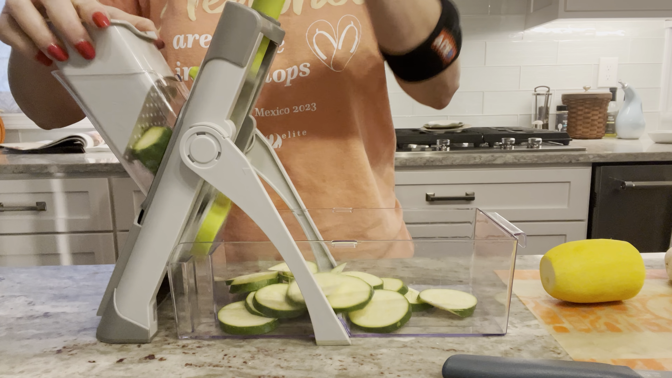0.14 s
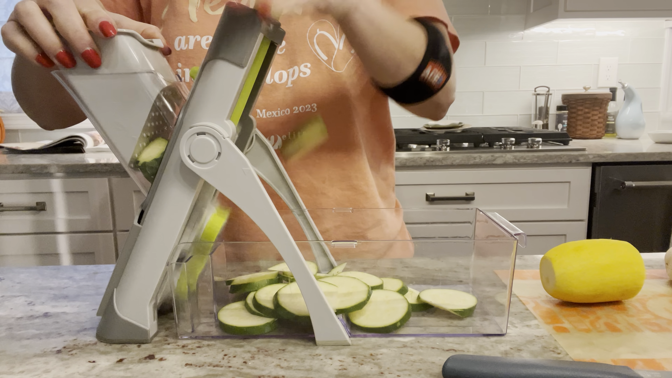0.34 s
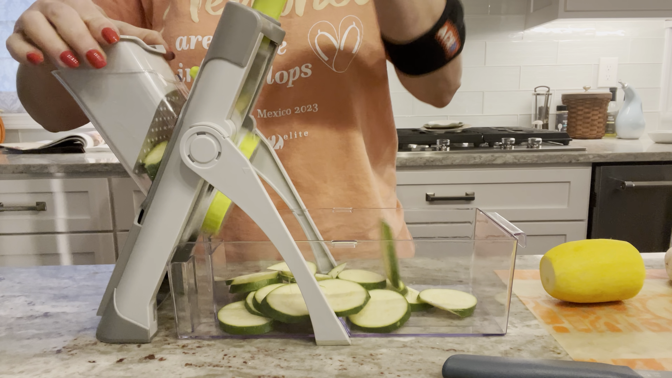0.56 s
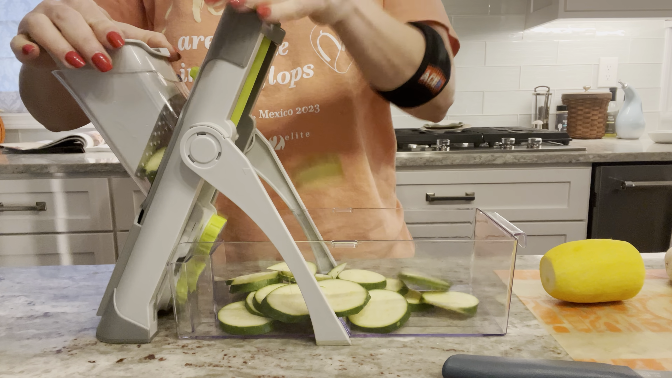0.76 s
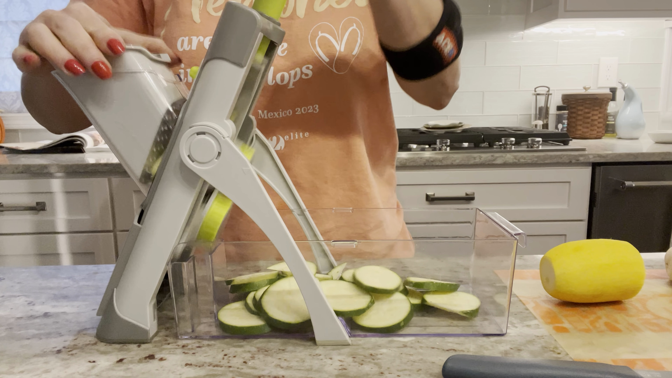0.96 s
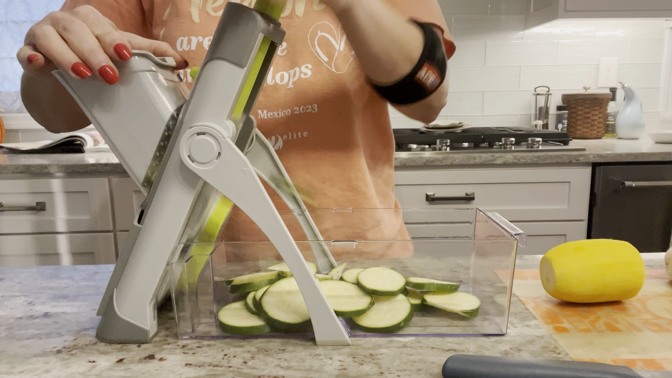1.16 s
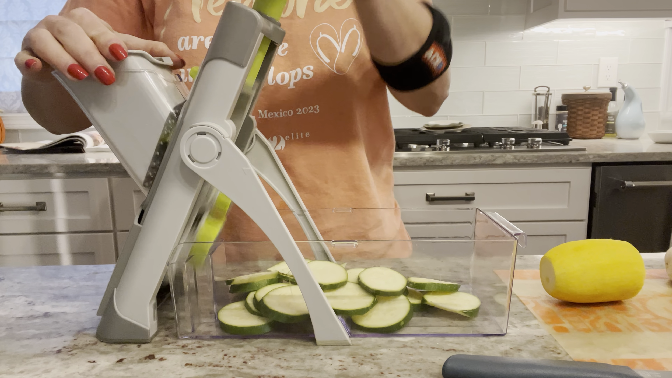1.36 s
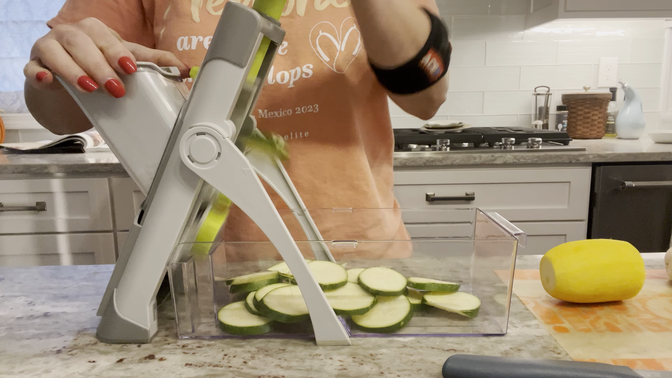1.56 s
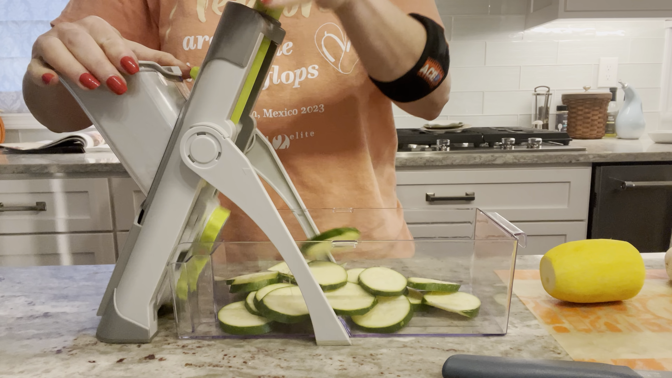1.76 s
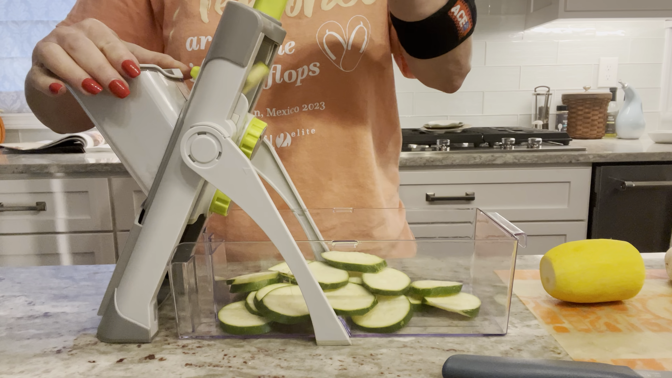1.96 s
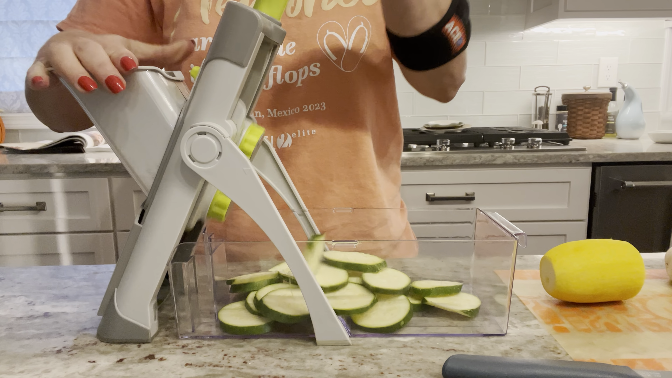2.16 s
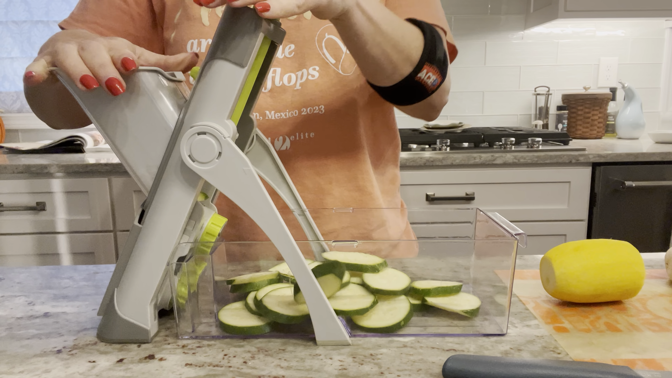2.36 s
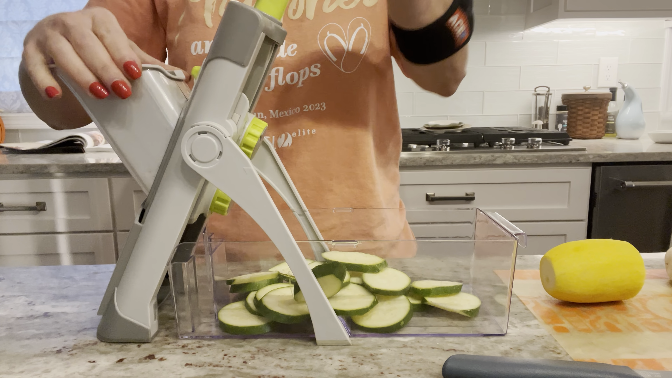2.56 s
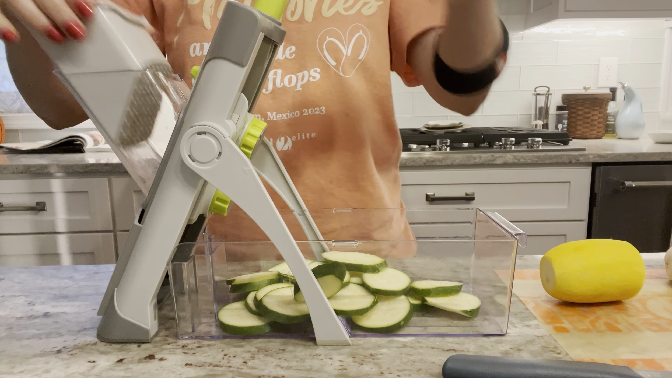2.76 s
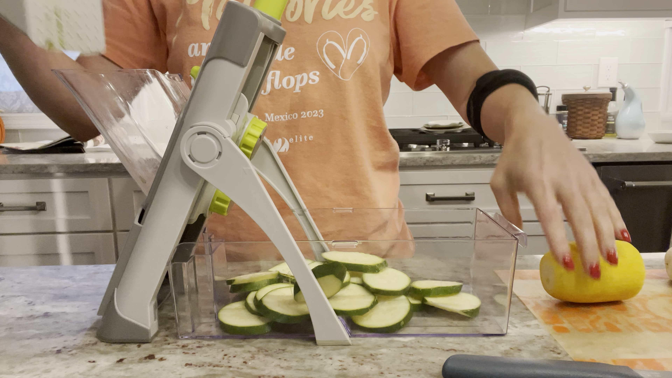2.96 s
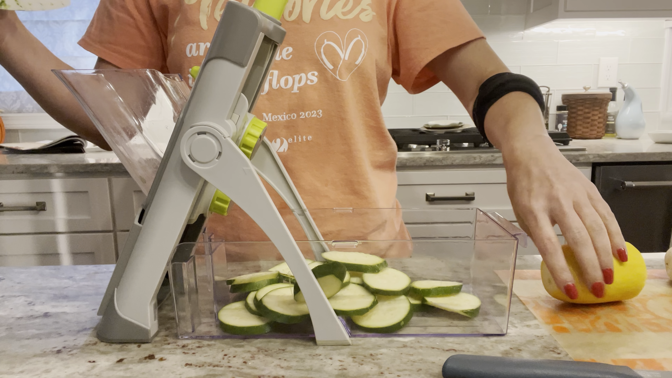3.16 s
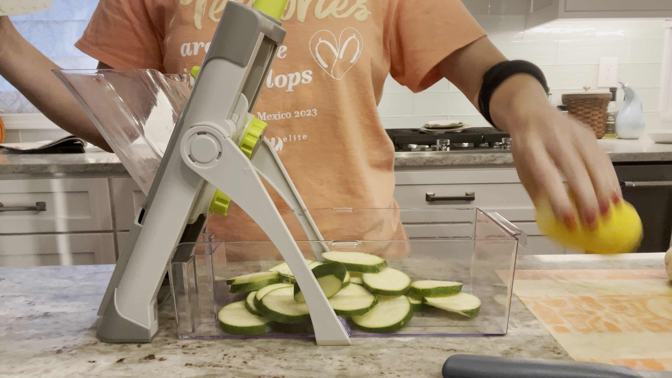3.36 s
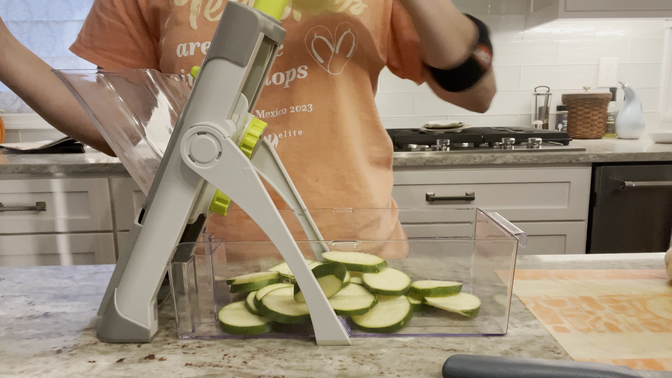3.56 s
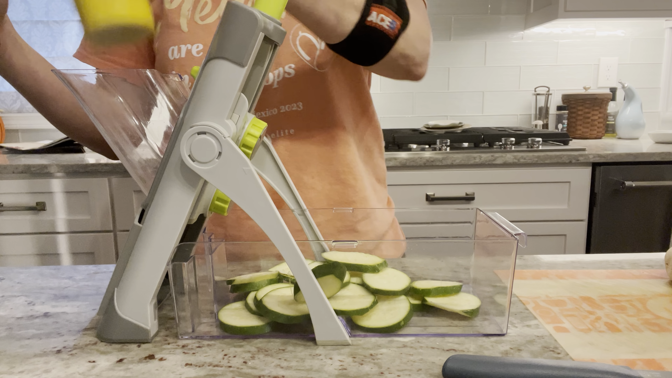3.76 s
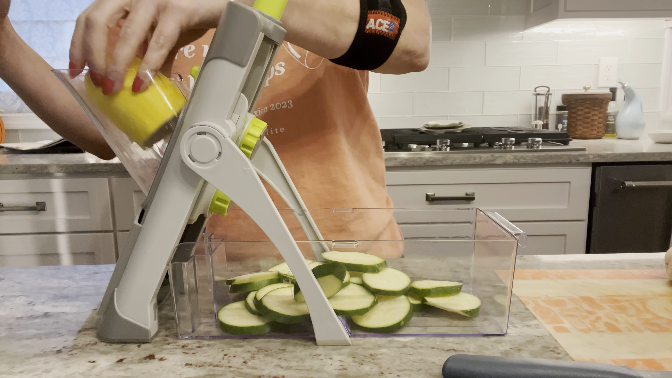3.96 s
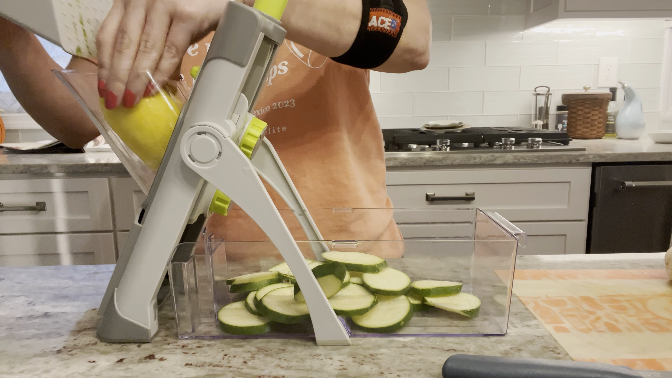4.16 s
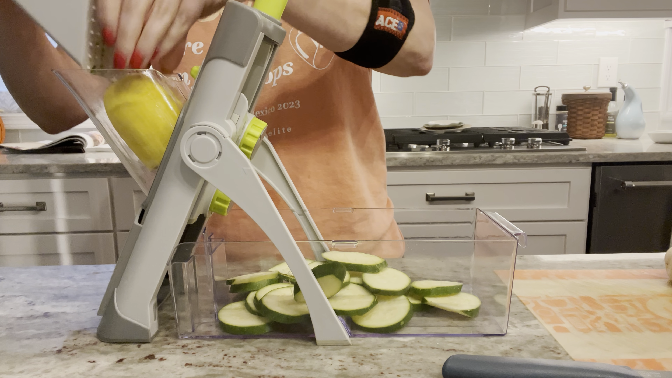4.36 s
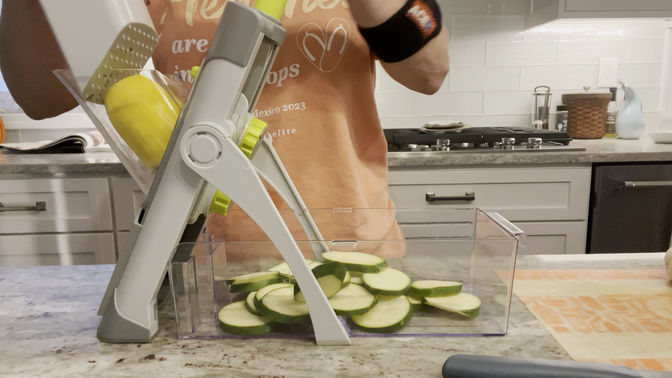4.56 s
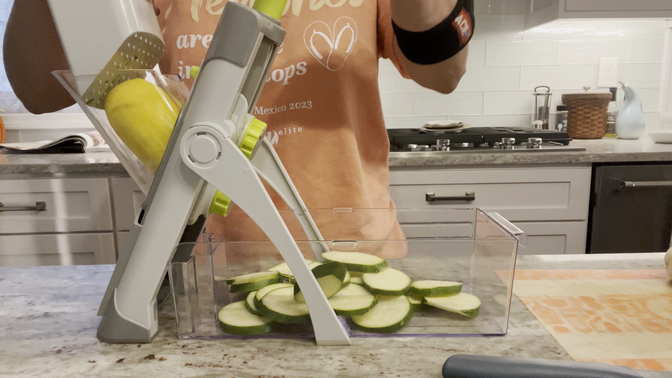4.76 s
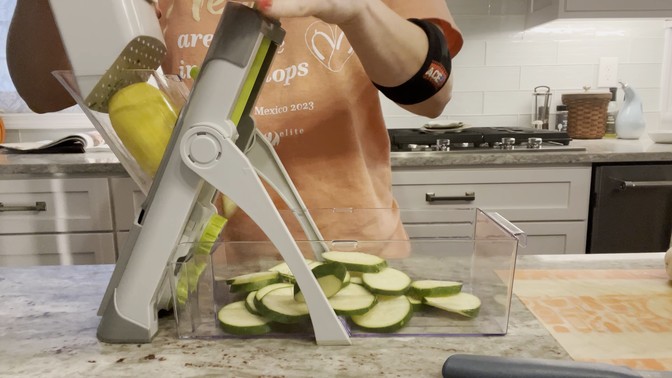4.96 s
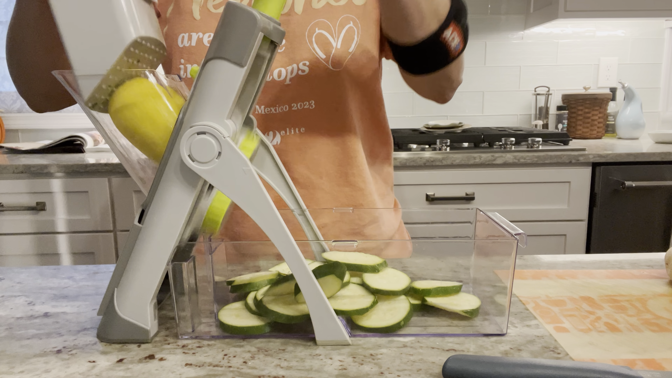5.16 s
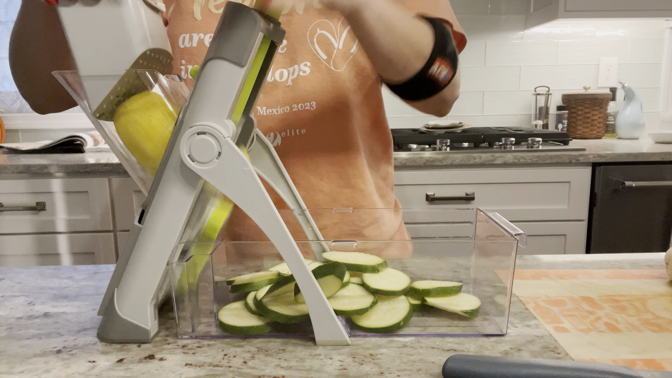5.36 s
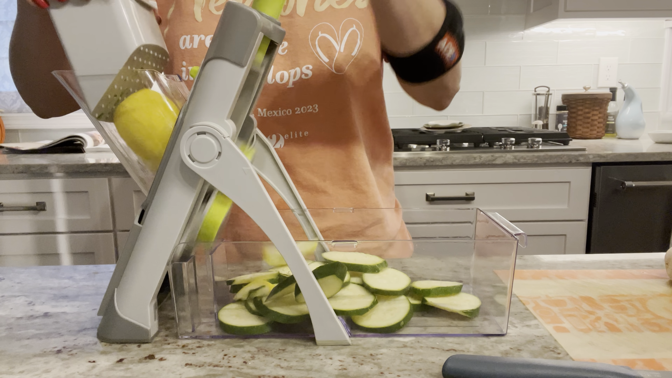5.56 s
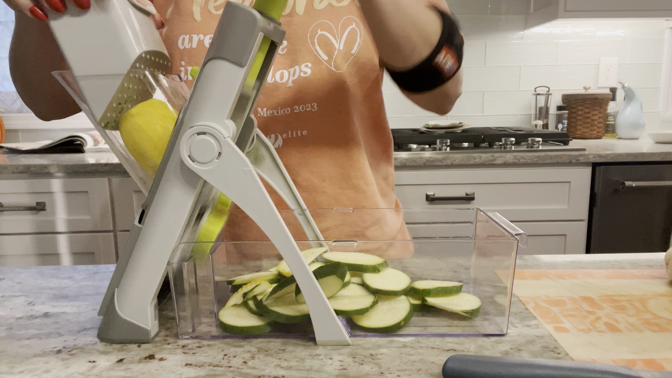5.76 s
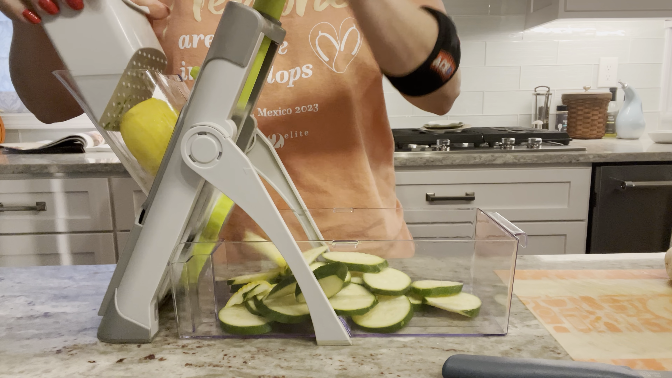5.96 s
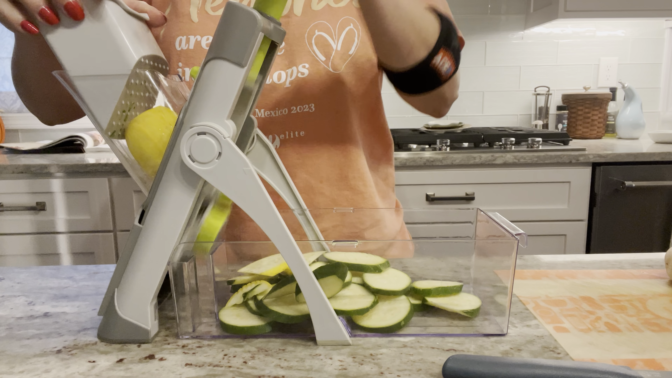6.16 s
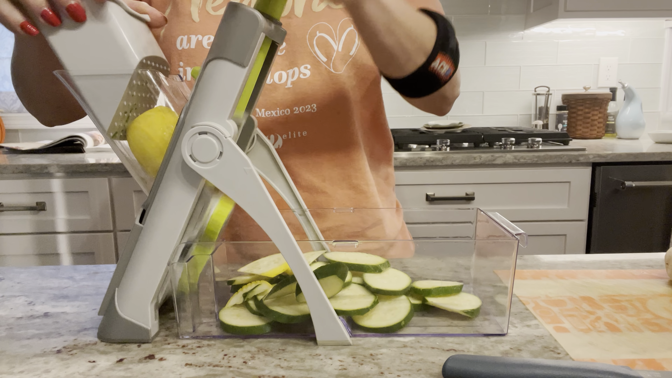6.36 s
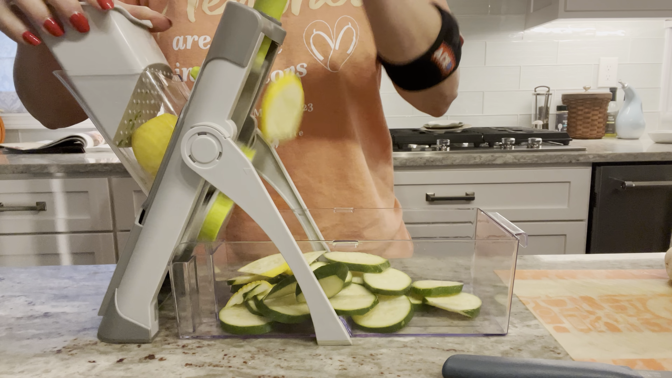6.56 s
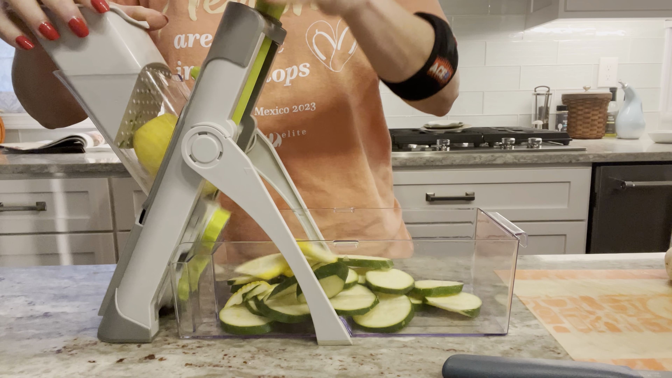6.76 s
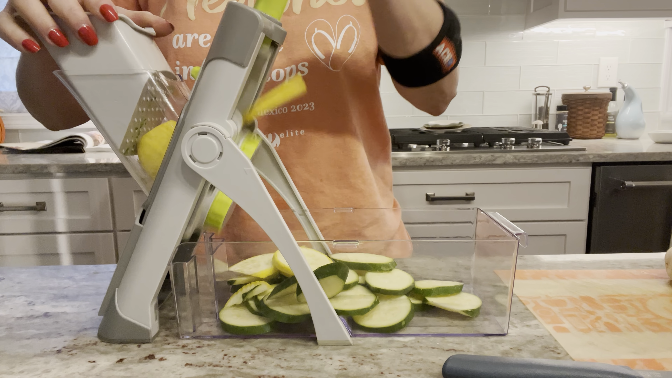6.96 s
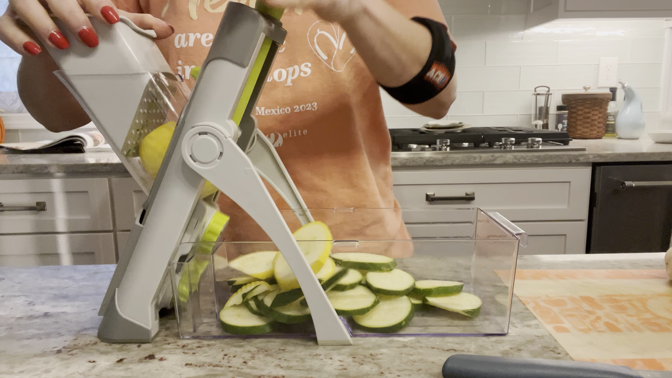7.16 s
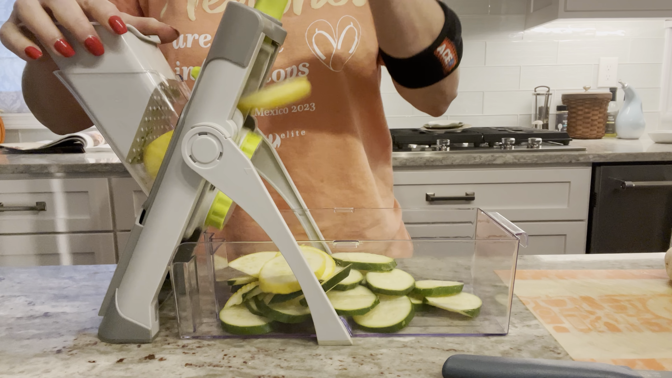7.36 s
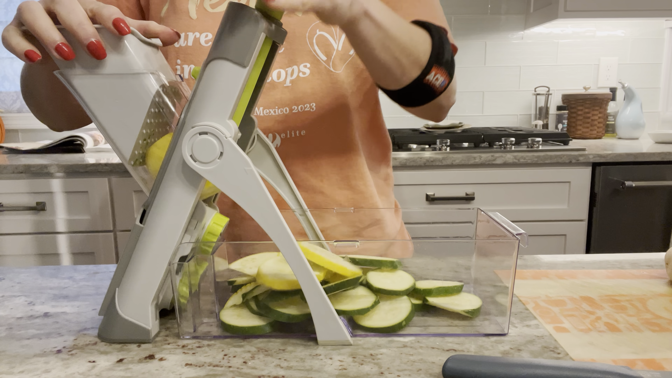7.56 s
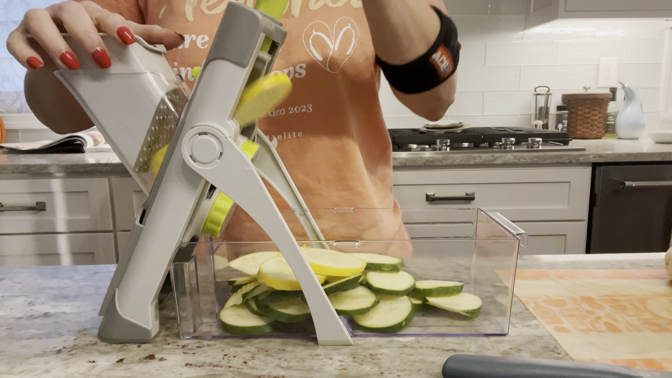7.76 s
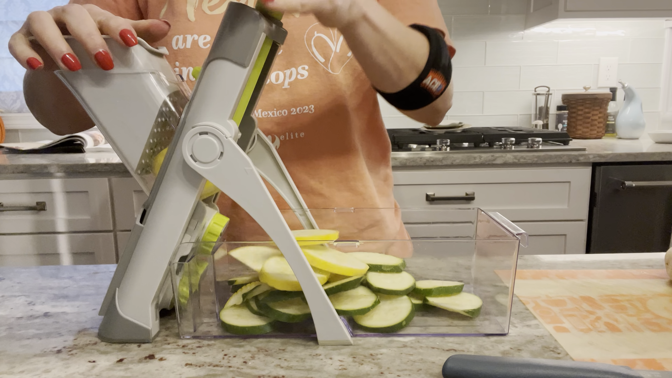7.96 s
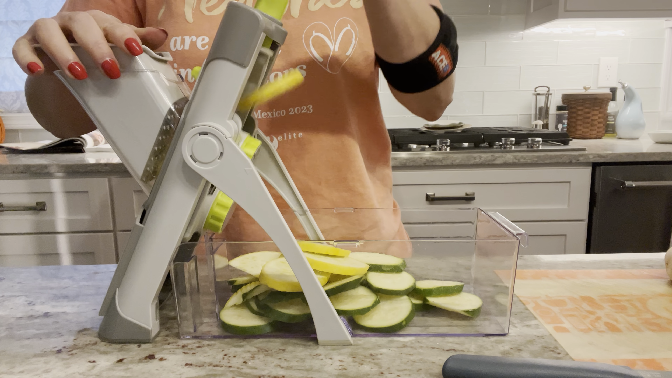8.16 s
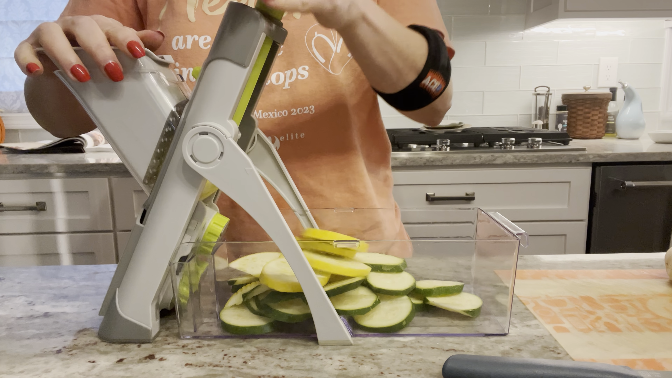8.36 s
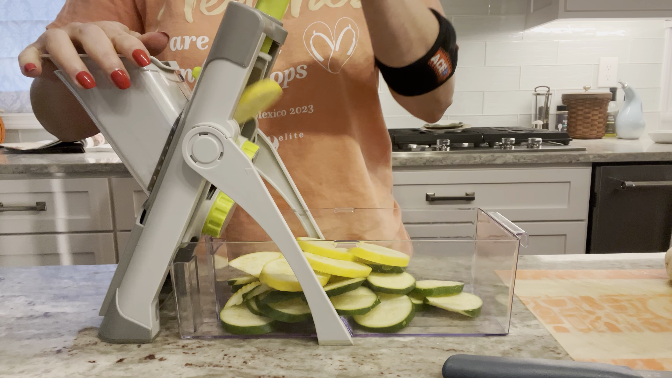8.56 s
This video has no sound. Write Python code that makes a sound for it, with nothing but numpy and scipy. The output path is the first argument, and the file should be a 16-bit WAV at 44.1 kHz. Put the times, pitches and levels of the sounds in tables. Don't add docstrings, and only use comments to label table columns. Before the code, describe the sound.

An upright plastic vegetable slicer scrapes, slams and springs back rhythmically on a stone counter, pauses for loading knocks and a squeak, then resumes faster.

```python
import sys
import numpy as np
from scipy import signal
from scipy.fft import rfft, irfft, next_fast_len
from scipy.io import wavfile
from scipy.ndimage import uniform_filter1d

SR = 44100
rng = np.random.default_rng(int(sys.argv[2]) if len(sys.argv) > 2 else 0)


def wav_out(sig):
    wavfile.write(sys.argv[1], SR, np.round(np.clip(np.atleast_2d(sig).T, -1, 1) * 32767).astype(np.int16))


def undo_db(level):
    steps = np.asarray(level, float) / 20
    return 10 ** steps


N = 379701
LEAD = next_fast_len(N + SR // 2) - N
SPOTS = 8

# [t/s, peak level/dB, treble/dB, counter thump/dB, frame rocking/dB]
SLAMS = [(0.373, -1.5, -13.5, -11.5, -29), (0.782, -3, -11.5, -13, -27.5), (1.205, -5.5, -12, -15, -28.5),
         (1.637, -2, -10.5, -12, -26), (2.305, -0.5, -12.5, -12.5, -29), (4.962, -1.5, -14.5, -13, -22.5),
         (5.399, 0, -15.5, -11, -24.5), (5.838, -0.5, -12, -12.5, -27), (6.237, -1, -14, -12, -23.5),
         (6.653, -1.5, -12, -12.5, -23), (7.06, -2, -13, -10.5, -25.5), (7.472, -2, -10, -10.5, -23.5),
         (7.87, -2, -13, -11, -25.5), (8.27, -2, -11.5, -11, -27)]
# [t/s, peak level/dB, treble/dB, strongest ring f/Hz, foot knock/dB]
RETURNS = [(0.175, -19, -1.5, 768, -51), (0.573, -8, -14, 831, -33.5), (0.982, -6.5, -7.5, 1933, -32),
           (1.446, -7, -12.5, 809, -34), (1.911, -2, -8, 770, -32), (2.58, -7, -11, 822, -56),
           (5.211, -2, -8.5, 2670, -34), (5.628, -3, -8, 741, -30.5), (6.031, -12, 2.5, 2850, -61),
           (6.053, -11.5, -13, 2020, -27), (6.473, -11, -15.5, 818, -26), (6.883, -7, -10.5, 703, -26),
           (7.282, -10.5, -7.5, 806, -27), (7.706, -5.5, -16.5, 686, -31), (8.089, -6.5, -18, 2040, -27),
           (8.489, -8, -11.5, 988, -35.5)]
# [f/Hz, level/dB, t60/s]
HOUSING_MODES = [(600, -18.5, 0.014), (690, -4.5, 0.06), (818, -4.5, 0.021), (910, 13.5, 0.026),
                 (1093, 8.5, 0.033), (1227, -4, 0.046), (1380, 2.5, 0.011), (1700, -3, 0.11),
                 (1900, -8, 0.037), (2367, -12, 0.055), (2850, -3, 0.012), (3300, -5.5, 0.021),
                 (3900, -14.5, 0.01)]
# [f/Hz, level/dB, t60/s]
ROCKING_MODES = [(69.4, -20.5, 0.4), (86, 1.5, 0.12), (127.3, -5.5, 0.097), (172, -6.5, 0.057),
                 (247, -17.5, 0.088), (312, -19, 0.093)]
# [f/Hz, density/dB]
CRACK_COLOUR = [(150, -7.5), (330, -12), (490, -24), (640, -2), (900, 1), (1700, 0.5), (2900, -5),
                (5500, -21), (8000, -21.5), (11000, -24), (14000, -26.5), (17000, -31.5)]


def read(table, hz):
    f, v = np.transpose(table)
    return np.interp(np.log(hz + 1), np.log(f + 1), v)


def shaped(x, table, treble_db=0, lag_s=0):
    hz = np.fft.rfftfreq(x.shape[-1], 1 / SR)
    lift = 1 / (1 + (4000 / (hz + 1)) ** 4)
    late = 1 - np.sqrt(lift) * (1 - np.exp(-2j * np.pi * hz * lag_s))
    gain = undo_db(read(table, hz) + treble_db * lift)
    return irfft(rfft(x) * gain * late, x.shape[-1])


def unit(x):
    return x / np.sqrt(np.mean(x ** 2))


def decay(t, t60):
    return np.exp(-np.log(1000) * t / t60)


def rings(modes, t, scatter_db=0, detune=0):
    hz, db, t60 = (column[:, None] for column in np.transpose(modes))
    louder, sharper = rng.standard_normal((2, len(modes), 1))
    tone = np.sin(2 * np.pi * hz * (1 + detune * sharper) * t)
    return np.sum(undo_db(db + scatter_db * louder) * decay(t, t60) * tone, 0)


def add(track, s, wave):
    i = int(s * SR) + LEAD
    track[i:i + len(wave)] += wave[:len(track) - i]


def grit(size, spread_db):
    return rng.standard_normal(size) * undo_db(spread_db * np.minimum(rng.exponential(size=size), 5.5))


def house():
    # [f/Hz, density/dB]
    murmur_colour = [(21, -41.5), (35, -7), (45, -6.5), (120, -5.5), (185, -7), (279, -15.5), (503, -17),
                     (684, -30.5), (955, -28.5), (3620, -60), (16000, -61.5)]
    mid, side = shaped(rng.standard_normal((2, N)), murmur_colour)
    swell = np.repeat(rng.standard_normal(N // 6000 + 1), 6000)[:N]
    swell = uniform_filter1d(swell, size=6000)
    level_db = -51.5 + 1.2 * np.clip(swell, -1, 1)
    return undo_db(level_db) * unit(mid + 0.55 * side * np.array([[1], [-1]]))


def room(x):
    # [f/Hz, t60/s, level/dB]
    bands = [(138, 0.93, -9.5), (389, 0.55, -1), (980, 0.48, -4.5), (2460, 0.3, -6.5), (5940, 0.29, -10),
             (13000, .15, -54.5)]
    early_t60_s, early_db = 0.023, 18
    t = np.arange(SR // 2) / SR
    tail = 0
    for hz, t60, db in bands:
        noise = rng.standard_normal((2, SPOTS, len(t)))
        if hz > 9000:
            noise[1] = noise[0] + .08 * noise[1]
        sos = signal.butter(3, [hz / 1.55, hz * 1.55], "bandpass", fs=SR, output="sos")
        fade = decay(t, t60) + undo_db(early_db) * decay(t, early_t60_s)
        tail = tail + undo_db(db) * signal.sosfilt(sos, noise) * fade / np.sqrt(t60 * SR / 14)
    tail = tail * (1 - np.exp(-t / 0.001))
    size = x.shape[1]
    return irfft(np.sum(rfft(x) * rfft(tail, size), 1), size)


def ports(x):
    # [f/Hz, phase/rad]
    left_lead = [(0, 0), (25, .3), (70, .1), (170, .3), (400, 0), (7500, .1), (8200, .6), (10300, 2.85),
                 (11100, 3.14), (12000, 3.45), (12700, 4.3), (14000, 6.1), (16400, 6.4)]
    # [f/Hz, level/dB]
    left_gain = [(60, -1.5), (150, -.7), (300, 1), (700, -1), (1300, -1), (2400, -2.8), (5000, -2.7),
                 (8000, 0), (16000, 0)]
    hz = np.fft.rfftfreq(x.shape[-1], 1 / SR)
    half = undo_db(read(left_gain, hz) / 2) * np.exp(.5j * read(left_lead, hz))
    return irfft(rfft(x) * np.array([half, 1 / half]), x.shape[-1])


def clack(db, treble_db, rattle_s, ring_hz, rise, cycles, ring_db, body_db, lag_s=0):
    t = np.arange(8192) / SR
    onset = 1 - np.exp(-(t / (rise * rattle_s)) ** 2)
    swell = onset * np.exp(-t / rattle_s) + 0.074 * np.exp(-t / (5 * rattle_s))
    chatter = grit(len(t), spread_db=2.5) * swell
    crack = unit(shaped(chatter, CRACK_COLOUR, treble_db + 21, lag_s))
    body = rings(HOUSING_MODES, t, scatter_db=2.5, detune=0.045)
    part = np.exp(-t * ring_hz / cycles * np.sqrt(ring_hz / 800)) * np.sin(2 * np.pi * ring_hz * t)
    body, part = (unit(signal.fftconvolve(chatter, ring)[:len(t)]) for ring in (body, part))
    wave = crack + undo_db(body_db) * body + undo_db(ring_db) * part
    return wave * undo_db(db - 6) / np.sqrt(np.max(uniform_filter1d(wave ** 2, size=100)))


def knock(db, treble_db, rattle_s, ring_hz, ring_db):
    return clack(db, treble_db, rattle_s, ring_hz, rise=0.35, cycles=6, ring_db=ring_db, body_db=-10)


def squeak():
    start_hz, glide_hz_per_s, rise_s, fall_s = 1000, 2000, .014, .012
    t = np.arange(-4096, 4096) / SR
    phase = 2 * np.pi * (start_hz * t + glide_hz_per_s * t ** 2 / 2)
    waver = 1 + 0.78 * unit(uniform_filter1d(rng.standard_normal(len(t)), size=150))
    swell = 1 / np.cosh(t / np.where(t < 0, rise_s, fall_s))
    octave = undo_db(-13) * swell * np.sin(2 * phase)
    return undo_db(-42) * swell * waver * (np.sin(phase) + octave)


def load_chute(air):
    # [t/s, peak level/dB, treble/dB, strongest ring f/Hz, ring level/dB]
    loading = [(3.861, -47.5, 2, 4200, -11), (3.899, -30.5, -18, 738, -1), (3.908, -51, -19, 2350, -3),
               (3.941, -31, -11, 2430, -2), (3.956, -50, 0, 7000, -8), (4.067, -36.5, -6, 2630, -3),
               (4.076, -41, -16, 980, -2), (4.114, -47, -10, 4730, -4), (4.122, -34.5, -15, 2000, -4),
               (4.13, -35.5, -30, 654, 5), (4.247, -27, -8.5, 2540, -6), (4.383, -19.5, -23.5, 1590, -6),
               (4.389, -32, -32, 574, 1.5), (4.439, -34.5, -20, 840, -14), (4.449, -38, -10, 2460, -5),
               (4.527, -41, -24, 1830, 1), (4.54, -31, -28, 1980, -8), (4.602, -22.5, -17.5, 1890, -12),
               (4.676, -43, -25, 680, 0), (4.747, -36, -5.5, 770, -13), (4.755, -36, -5, 3500, -11),
               (4.772, -39, -28, 1500, -15), (4.799, -40, -6, 746, -8), (4.825, -39, 13, 5200, -13),
               (4.841, -37, -15, 990, -4), (4.86, -36, -15, 1400, -6), (4.874, -36, -7, 2500, -4),
               (4.882, -34, -7, 1710, -5), (4.896, -18, -7, 1780, 2), (4.905, -21, -11, 1700, 2),
               (4.915, -20, -23, 727, -4), (4.94, -29, -12, 1000, -8)]
    for k, (s, db, treble_db, hz, ring_db) in enumerate(loading):
        add(air[k % SPOTS], s, knock(db, treble_db, 0.0027, hz, ring_db))
    add(air[0], 4.03 - 4096 / SR, squeak())


def thud(db, hz):
    rise_s, t60_s = 0.0037, 0.25
    t = np.arange(SR // 4) / SR
    return undo_db(db) * (1 - np.exp(-t / rise_s)) * decay(t, t60_s) * np.sin(2 * np.pi * hz * t)


def drop_slices(air, counter):
    # [t/s, peak level/dB, strongest ring f/Hz]
    taps = [(0.186, -13, 767), (1.151, -29.5, 655), (1.318, -33, 990), (2.16, -32.5, 667),
            (2.199, -28.5, 1900), (2.684, -34, 860), (5.051, -22, 724), (5.083, -26, 715),
            (5.157, -21.5, 1003), (5.714, -23, 930), (5.801, -18, 950), (6.113, -22, 870),
            (6.197, -15.5, 910), (6.356, -24, 690), (6.643, -18, 1200), (6.782, -26, 680),
            (6.92, -20, 1000), (7.187, -24, 640), (7.253, -22.5, 980), (7.289, -11, 855),
            (7.34, -23.5, 825), (7.995, -23.5, 735), (8.222, -26.5, 845), (8.404, -22.5, 826),
            (8.58, -24, 822)]
    # [t/s, level/dB, f/Hz]
    landings = [(.19, -35, 182), (1.115, -32, 182), (1.375, -29, 173), (2.165, -39, 186), (2.685, -36, 72),
                (3.9, -46, 85), (4.07, -46, 110), (4.124, -45, 75), (4.75, -44, 120), (5.05, -37, 180),
                (5.7, -27, 75), (6.11, -30, 110), (6.921, -35, 168), (7.72, -36, 90)]
    for k, (s, db, hz) in enumerate(taps):
        add(air[k % SPOTS], s, knock(db, treble_db=-18.5, rattle_s=0.0034, ring_hz=hz, ring_db=-3))
    for s, db, hz in landings:
        add(counter, s, thud(db, hz))


def click_fibres(air):
    # [t/s, peak level/dB, treble/dB, strongest ring f/Hz]
    clicks = [(.149, -27, -3, 3200), (.27, -37, -8, 3100), (0.314, -32, -11, 3570), (.35, -23.5, -10, 3200),
              (.701, -34, -1, 3160), (.932, -33, -10, 4100), (1.098, -30, -14, 4400),
              (1.535, -38, -1, 4160), (1.628, -17.5, -17, 1000), (1.735, -34, -3, 5200),
              (1.788, -39, 5, 6500), (1.798, -39, -1, 5200), (1.808, -33, 2, 6400), (1.832, -35, -6, 4200),
              (1.9, -27, -5, 3290), (2.18, -38, -10, 2907), (2.509, -34, -12, 3900),
              (2.784, -42, -10.5, 2600), (2.866, -35.5, -5, 3130), (5.2, -22, -6, 5070),
              (5.302, -30, 1, 3000), (5.483, -46, -4, 6000), (5.538, -30, -10, 4300),
              (5.576, -23, -13, 3900), (6.467, -21, -16, 1700), (6.575, -27, -10, 2200),
              (6.631, -22, -20, 1500), (6.993, -29, -6, 3380), (7.651, -30, -2, 3950),
              (7.674, -14.5, -11, 1500), (7.701, -23, -12, 2320), (7.842, -30, -10, 3300),
              (8.05, -29, -3, 3970), (8.244, -23, -5, 3590), (8.474, -22, -17, 3380),
              (8.538, -31.5, -8, 3900)]
    for k, (s, db, treble_db, hz) in enumerate(clicks):
        add(air[k % SPOTS], s, knock(db, treble_db, rattle_s=0.001, ring_hz=hz, ring_db=-8.5))


def tick_rails(air):
    # [t/s, peak level/dB, strongest ring f/Hz]
    ticks = [(0.097, -29, 2740), (0.237, -25, 840), (0.486, -23.5, 738), (0.53, -28, 600),
             (0.644, -31, 780), (0.758, -27, 983), (0.942, -23.5, 1900), (0.966, -20, 890),
             (1.115, -34, 932), (1.373, -19, 796), (1.843, -24.5, 684), (2.246, -26.5, 774),
             (2.466, -28.5, 1017), (2.855, -35, 960), (5.114, -21.5, 830), (5.554, -19.5, 2830),
             (5.598, -16, 2640), (5.752, -23.5, 910), (5.947, -27, 930), (6.067, -13, 1500),
             (6.407, -24, 655), (6.44, -20.5, 1700), (6.508, -27, 3840), (6.605, -22, 840),
             (6.817, -19, 666), (6.853, -21.5, 724), (7.413, -26, 692), (8.069, -19, 2080),
             (8.14, -28, 796), (8.457, -21.5, 710)]
    for k, (s, db, hz) in enumerate(ticks):
        treble_db = -6.5 - 0.76 * (db + 24.5)
        rattle_s = 0.0016 * 10 ** ((db + 28) / 28.5)
        add(air[k % SPOTS], s, knock(db, treble_db, rattle_s, hz, ring_db=-6))


def rub_db(s):
    # [t/s, level/dB]
    handling = [(0, -39), (.28, -43), (.7, -45.5), (1.1, -44), (1.85, -42.5), (2.17, -44.5), (2.5, -64),
                (2.85, -47.5), (2.98, -73), (3.84, -91.5), (3.91, -53), (4.24, -60), (4.77, -55),
                (4.9, -42.5), (5.3, -37.5), (6.55, -47.5), (7.4, -40), (8.61, -47)]
    # [length/s, level as it bites/dB, level at the stop/dB]
    cuts = [(0.031, -33.5, -30), (0.044, -34.5, -29.5), (0.08, -46, -30), (.06, -36.5, -31),
            (0.078, -41.5, -35), (0.093, -36, -36), (0.091, -33, -29), (0.078, -30, -34),
            (0.077, -34.5, -26), (0.065, -33.5, -26.5), (0.06, -36, -22), (0.047, -32.5, -25),
            (0.051, -36, -24), (0.056, -40.5, -23)]
    # [length/s, gliding level/dB, level at the top stop/dB]
    springs = [(0.077, -45, -30), (.14, -46.5, -28), (.14, -42, -27.5), (0.14, -42.5, -34), (.2, -51, -32),
               (0.17, -44, -41), (0.163, -52, -22), (0.125, -46, -17.5), (0.051, -34.5, -30.5),
               (.02, -42, -39), (0.065, -35, -26.5), (0.19, -38.5, -21), (0.11, -36, -27),
               (0.11, -36.5, -32.5), (0.064, -34, -24.5), (0.17, -38.5, -23.5)]
    slam_jolts = [-20, -21.5, -18.5, -13.5, -26.5, -25, -26, -25, -18, -21, -19, -14, -19, -22]
    bite_s, jolt_s = 0.016, 0.01
    strokes = []
    for (stop, db, *_), (length, bite_db, stop_db), jolt_db in zip(SLAMS, cuts, slam_jolts):
        rise = length * 20 / max(stop_db - bite_db, 1)
        strokes.append((stop, length, bite_db, stop_db, rise, db - 34, 0.16, db + jolt_db))
    for (stop, db, *_), (length, glide_db, stop_db) in zip(RETURNS, springs):
        strokes.append((stop, length, glide_db, stop_db, 0.038, db - 27, 0.18, db - 18))
    power = undo_db(2 * np.interp(s, *np.transpose(handling)))
    for stop, length, start_db, stop_db, rise, after_db, settle, jolt_db in strokes:
        near = slice(*np.searchsorted(s, [stop - .5, stop + .5]))
        late = s[near] - stop
        moving = np.maximum(start_db, stop_db + 20 * late / rise)
        moving = moving + 20 * np.minimum(late + length, 0) / bite_s
        moving = np.maximum(moving, jolt_db + 20 * late / jolt_s)
        power[near] += undo_db(2 * np.where(late < 0, moving, after_db - 20 * late / settle))
    return 10 * np.log10(power)


def scrape():
    s = np.arange(-LEAD, N) / SR
    db = rub_db(s)
    catch = np.repeat(rng.standard_normal(len(s) // 300 + 1), 300)[:len(s)]
    catch = uniform_filter1d(catch, size=200)
    snapping = rng.random(len(s)) < 300 / SR
    snaps = undo_db(13.5) * snapping * np.clip(rng.standard_normal(len(s)), -2, 2)
    slips = (grit(len(s), spread_db=3.5) + snaps) * undo_db(db + 1.8 * catch) / 2
    t = np.arange(8192) / SR
    hum, rumble = (signal.oaconvolve(slips, unit(rings(modes, t)) / 90)[:len(s)]
                   for modes in (HOUSING_MODES, ROCKING_MODES))
    high = signal.butter(2, 4000, "high", fs=SR, output="sos")
    bright_db = 10.5 + 0.33 * np.minimum(db + 43, 0)
    bright = signal.sosfilt(high, slips * undo_db(bright_db))
    hiss = shaped(undo_db(7.5) * slips, CRACK_COLOUR, -4) + shaped(bright, CRACK_COLOUR)
    return undo_db(-8.5) * hum + hiss, undo_db(-4) * rumble


def thump(db, rock_db):
    # [f/Hz, strength with the sign of the mode shape, t60/s]
    bass_modes = [(54.6, -.014, .6), (70, .145, .377), (77.2, -.058, .607), (82.7, .141, .38),
                  (93.4, -.481, .093), (127.4, -.139, .226), (132.5, .462, .088), (154, .147, .202),
                  (159.1, -.03, .431), (187.1, -.208, .198), (195.4, -.017, .6), (208.2, -.031, .33),
                  (224.1, -.076, .224), (254.5, -.031, .58), (256, .067, .223), (275.8, .047, .353),
                  (290, .068, .251), (324.8, .01, .47), (351.7, .016, .307), (404.8, -.09, .036)]
    swell_s, fade_s = 0.04, 0.15
    t = np.arange(SR // 2) / SR
    hz, strength, t60 = (column[:, None] for column in np.transpose(bass_modes))
    bass = np.sum(strength * decay(t, t60) * np.sin(2 * np.pi * hz * t), 0)
    shake = rng.standard_normal(len(t)) * (1 - np.exp(-(t / swell_s) ** 2)) * np.exp(-t / fade_s)
    rock = signal.fftconvolve(shake, rings(ROCKING_MODES, t[:8192]))[:len(t)]
    return undo_db(db + 12.5) * bass + undo_db(rock_db - 11) * unit(rock)


def hit_top(air, counter):
    part_rings = [-16, -6.5, -9.5, -12.5, -7.5, -0.5, -8.5, -11, -3, -4, -16, -7, -10, -7, -8, -14]
    for k, (s, db, treble_db, hz, foot_db) in enumerate(RETURNS):
        add(air[k % SPOTS], s, clack(db, treble_db, 0.0037, hz, rise=0.39, cycles=6,
                                     ring_db=part_rings[k], body_db=-5.5))
        add(counter, s, thump(foot_db - 0.5, foot_db - 5))


def slam_bottom(air, counter):
    # [peak level/dB, treble/dB, counter thump/dB, frame rocking/dB]
    earlier = (-1.5, -13.5, -10, -23)
    thump_lag_s = 0.00063
    for k, (s, db, treble_db, thump_db, rock_db) in enumerate([(-.035, *earlier), *SLAMS]):
        add(air[k % SPOTS], s, clack(db, treble_db, 0.0035, 1115, rise=0.32, cycles=0.73,
                                     ring_db=-14.5, body_db=-13, lag_s=.002))
        add(counter, s + thump_lag_s, thump(thump_db, rock_db))


def scene():
    air, counter = np.zeros((SPOTS, N + LEAD)), np.zeros(N + LEAD)
    load_chute(air)
    drop_slices(air, counter)
    click_fibres(air)
    tick_rails(air)
    hit_top(air, counter)
    slam_bottom(air, counter)
    rub, rumble = scrape()
    travel = np.pi * (np.arange(len(rub)) / SR * 2.4 + np.arange(SPOTS)[:, None] / SPOTS)
    air = air + rub * np.cos(travel) ** 2 * 2 / SPOTS
    counter = counter + rumble
    direct = air.sum(0) + counter
    air[0] += 0.17 * counter
    return ports(direct + room(air))[:, LEAD:] + house()


def band_limit(x):
    return signal.sosfilt(signal.butter(12, 16800, fs=SR, output="sos"), x)


def record(dry):
    low_cut = signal.butter(2, 55, "high", fs=SR, output="sos")
    top_cut = signal.ellip(8, .2, 50, 15750, fs=SR, output="sos")
    x = signal.sosfilt(low_cut, dry)
    x = np.tanh(.88 * x) / .87
    return band_limit(signal.sosfilt(top_cut, x))


dry = scene()
out = record(dry)
wav_out(out)
```